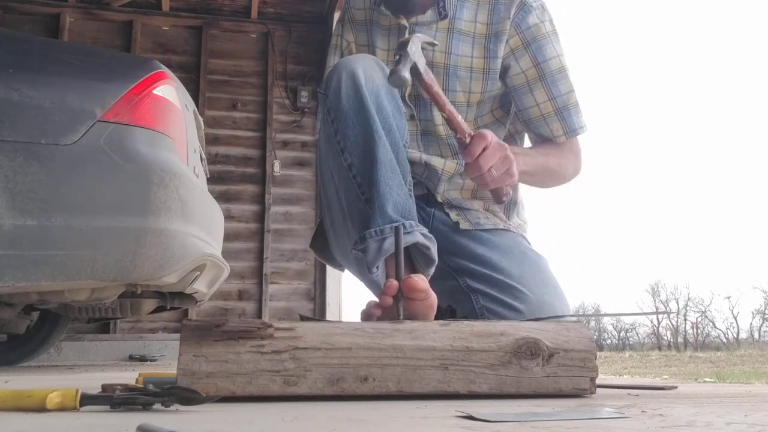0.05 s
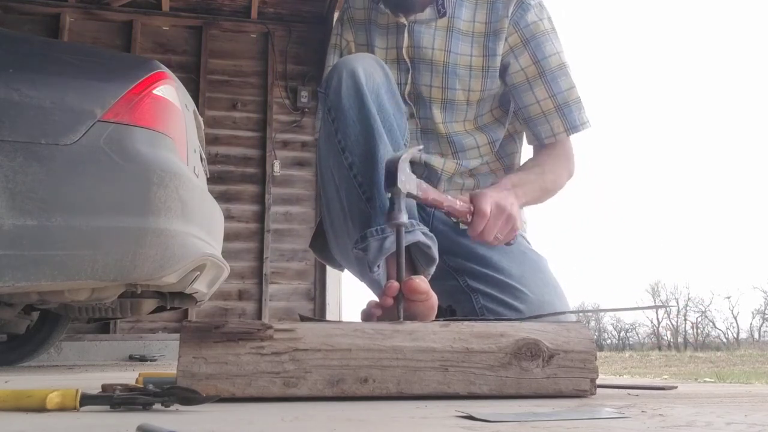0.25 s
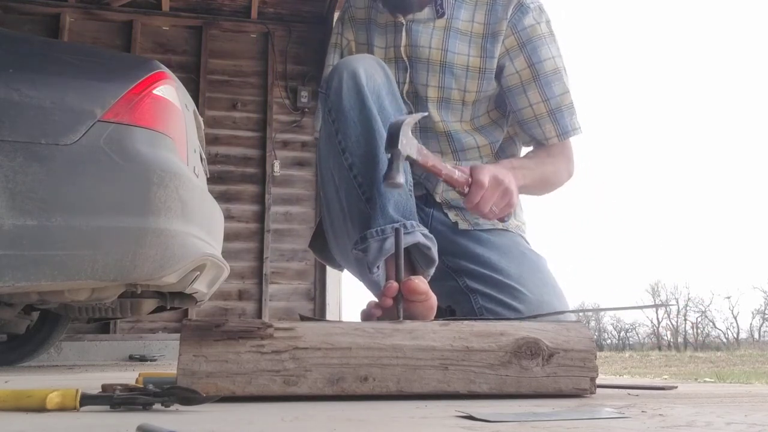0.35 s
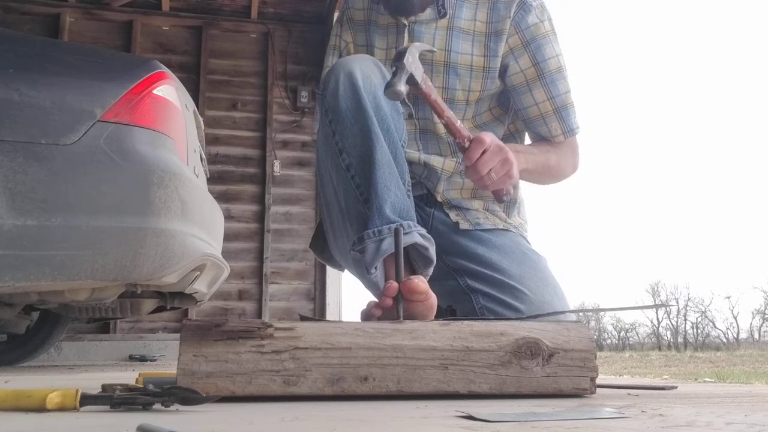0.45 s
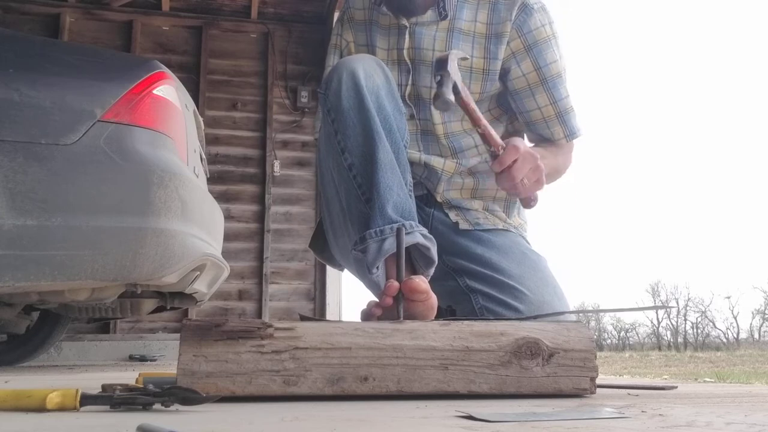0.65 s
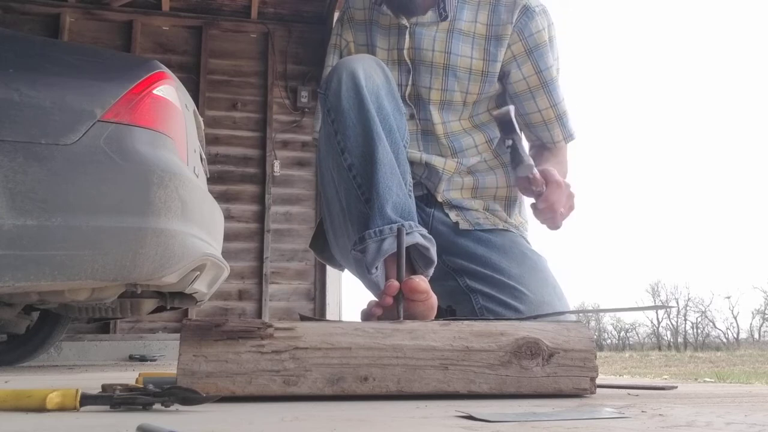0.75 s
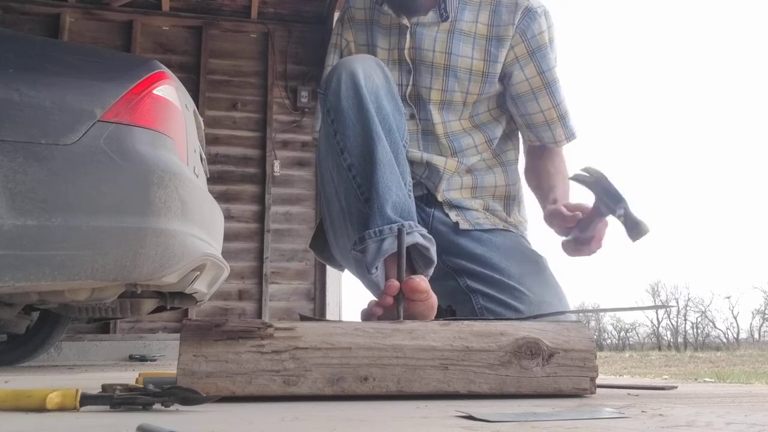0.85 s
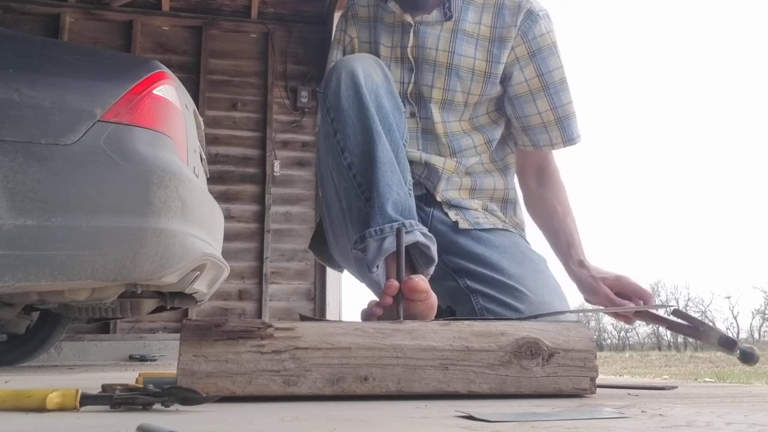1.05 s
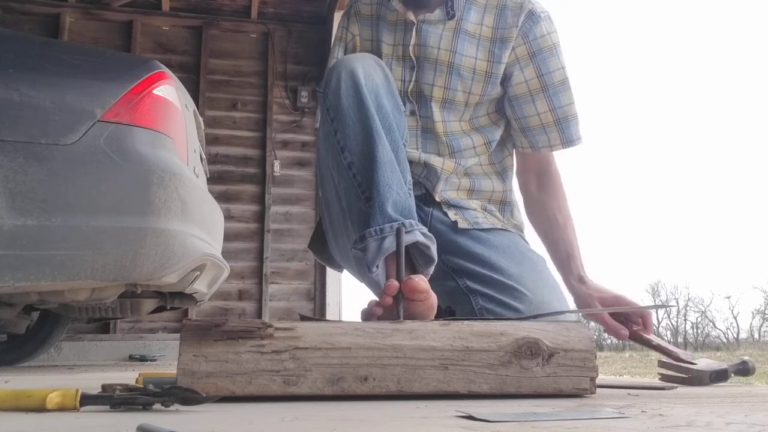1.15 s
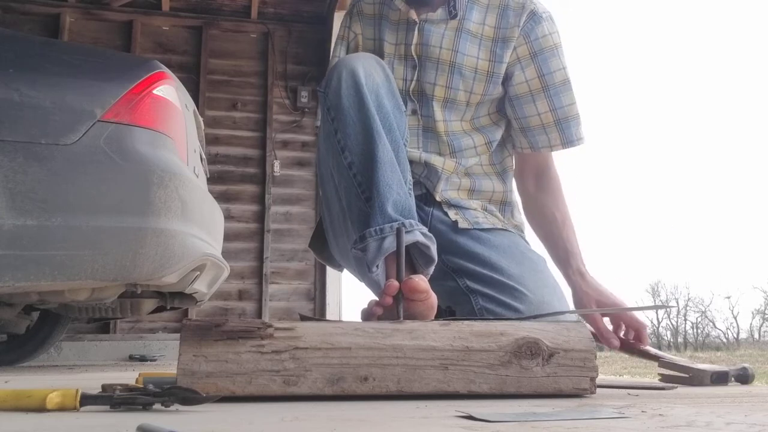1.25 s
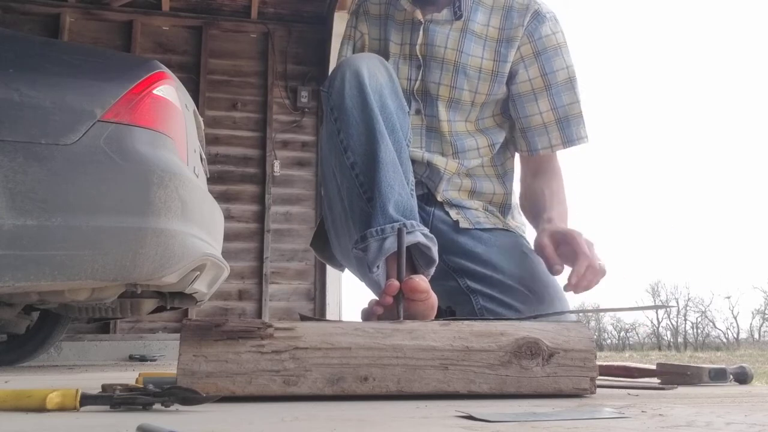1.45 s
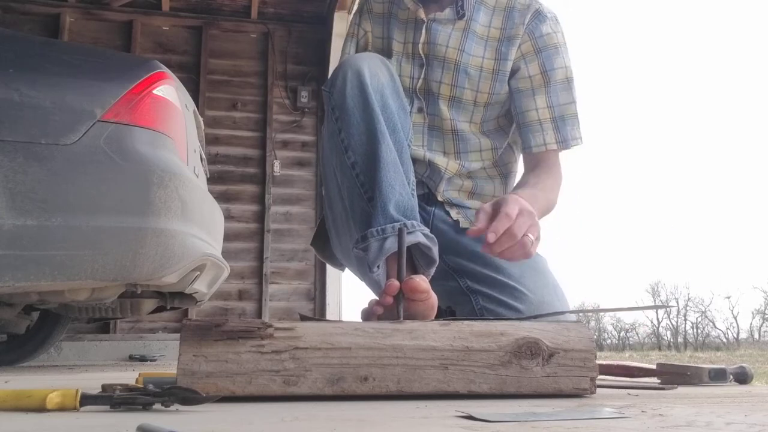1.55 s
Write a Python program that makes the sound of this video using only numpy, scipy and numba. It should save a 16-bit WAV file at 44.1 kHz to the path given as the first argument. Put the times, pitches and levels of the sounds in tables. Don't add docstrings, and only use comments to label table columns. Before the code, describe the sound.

A hammer strikes a steel punch through thin sheet metal on a log, over the fading ring of an earlier blow; then the hammer is set down, knocking and scraping on concrete. Open garage, close phone microphone.

```python
import sys
import numpy as np
from scipy import signal
from scipy.fft import rfft, irfft
from scipy.io import wavfile
from numba import njit

SR = 44100
rng = np.random.default_rng(int(sys.argv[2]) if len(sys.argv) > 2 else 0)


def makeup_ratio(level_db):
    decades = np.asarray(level_db, float) / 20
    return 10 ** decades


def inscribe(sig):
    pcm = np.round(np.clip(np.atleast_2d(sig).T, -1, 1) * 32767)
    wavfile.write(sys.argv[1], SR, pcm.astype(np.int16))


N = 70560
ALIKE_HZ = 1300
EARS = np.array([[1], [-1]])


def colour(table, hz):
    table_hz, value = np.array(table).T
    return np.interp(np.log(hz + 1), np.log(table_hz), value)


def ring(modes, seconds):
    hz, db, t60 = np.array(modes, float).T[:, :, None]
    t = np.arange(int(seconds * SR)) / SR
    turn = rng.uniform(-np.pi, np.pi, (len(hz), 2))
    apart = turn[:, 1] * np.minimum(hz[:, 0] / ALIKE_HZ, 1) / 3
    start = (makeup_ratio(db) * np.exp(1j * turn[:, :1])).astype(np.complex64)
    spin_and_decay = (2j * np.pi * hz - np.log(1000) / t60).astype(np.complex64)
    z = start * np.exp(spin_and_decay * t.astype(np.float32))
    ears = np.exp(1j * np.array([apart, -apart])).astype(np.complex64)
    return (ears @ z).imag.astype(float)


def noise(table, grains=1):
    hz = np.arange(N // 2 + 1) * SR / N
    mid, side = rfft(rng.standard_normal((2, N)) * grains) * makeup_ratio(colour(table, hz))
    width = np.minimum(hz / ALIKE_HZ + 0.23, .85)
    x = irfft(mid + EARS * side * width, N)
    return x / np.std(x)


def add(out, x, s):
    i = int(s * SR)
    x = x[:, max(-i, 0):N - i]
    out[:, max(i, 0):max(i, 0) + x.shape[1]] += x


# frequency in Hz, level in dB per Hz.
AIR_COLOUR = [(20, -11), (50, -2), (120, -4), (200, -13.5), (300, -17.5), (600, -36.5), (1500, -43),
              (16000, -44.5)]


def air():
    t = np.arange(N) / SR
    early_db = 11.5 * (t < BLOWS[1][0])
    return noise(AIR_COLOUR) * makeup_ratio(-69.5 + early_db)


# time in seconds, pitch in Hz, level in dB, second order level in dB.
ENGINE = [(0.0, 89, -43.5, -66), (0.24, 84.08, -44, -53.5), (0.27, 86.74, -74, -68), (0.28, 83.8, -57, -63),
          (0.342, 79.15, -62.5, -50), (0.466, 80.17, -56, -62), (0.944, 80.53, -59.5, -68),
          (1.136, 81.36, -63, -67), (1.234, 85.2, -74, -68.5), (1.292, 84.9, -56.5, -77.5),
          (1.542, 87.7, -46.5, -69.5), (1.6, 85, -49, -60)]


def engine():
    t = np.arange(N) / SR
    s, *columns = np.array(ENGINE).T
    hz, db, second_db = (np.interp(t, s, column) for column in columns)
    turn = 2 * np.pi * np.cumsum(hz) / SR
    wobble_db = 1.5 * np.interp(t, np.arange(80) / 40, rng.standard_normal(80))
    first = makeup_ratio(db + wobble_db) * np.sin(turn)
    second = makeup_ratio(second_db - wobble_db) * np.sin(2 * turn)
    return np.sqrt(2) * (first + second)


def garage(sound):
    t60_s, gap_s, top_hz, level_db = .45, .004, 6570, -9
    t = np.arange(SR // 2) / SR
    fade = np.exp(-np.log(1000) * t / t60_s) * (t > gap_s)
    tail = signal.lfilter(*signal.butter(1, top_hz, fs=SR), rng.standard_normal((2, SR // 2))) * fade
    tail = tail / np.sqrt(np.sum(tail[0] ** 2))
    return makeup_ratio(level_db) * signal.fftconvolve(sound.mean(0)[None], tail, axes=1)[:, :N]


# frequency in Hz, level in dB per Hz.
GRIT = [(100, -32), (200, -5.5), (700, -11), (2100, -18), (3200, -17.5), (6800, -31), (7400, -42),
        (16000, -47)]
# time in seconds, level in dB.
DRAG = [
    (1.102, -78),
    (1.106, -47),
    (1.2, -52.5),
    (1.3, -58.5),
    (1.32, -50.5),
    (1.44, -52),
    (1.5, -50.5),
    (1.6, -54),
]
# frequency in Hz, width in Hz, level in dB.
SCRAPE = [(1230, 56, -12.5), (2610, 130, 7), (3413, 53, 3), (4180, 110, 9), (5100, 50, 19.5),
          (5860, 40, 20), (6755, 91, 16), (8100, 220, 14), (11000, 510, 4.5), (14500, 240, 15)]


def scrape():
    grains_per_s, spread_db = 8100, 2
    t = np.arange(N) / SR
    grains = (rng.random(N) < grains_per_s / SR) * makeup_ratio(spread_db * rng.exponential(size=N))
    drag = makeup_ratio(np.interp(t, *np.array(DRAG).T)) * (t > DRAG[0][0])
    grit = noise(GRIT, grains) * drag
    out = grit.copy()
    for hz, width, db in SCRAPE:
        out += makeup_ratio(db) * signal.lfilter(*signal.iirpeak(hz, hz / width, SR), grit)
    return out


def touch(modes):
    scatter_db = 2 * rng.standard_normal((len(modes), 1))
    return ring(np.array(modes) + [0, 1, 0] * scatter_db, .16)


# start in seconds, then handle, head, cheek and claw tick levels in dB.
KNOCKS = [(1.1045, -32.5, -37, -47, -49.5), (1.1245, -19.5, -50, -58, -54), (1.1274, -22, -25, -42, -35),
          (1.135, -25.5, -34, -44, -66), (1.142, -27.5, -20, -55, -45), (1.150, -29, -28, -40, -59),
          (1.164, -37.5, -26.5, -54, -71), (1.176, -58, -30.5, -54, -67), (1.189, -45, -32.5, -56, -71),
          (1.206, -62, -33.5, -57, -62.5), (1.218, -32, -42.5, -53, -48), (1.232, -62, -46, -60, -66),
          (1.2544, -31, -41, -43, -44.5), (1.264, -35, -25, -38, -56), (1.299, -60, -45, -71, -69.5),
          (1.319, -24.5, -30, -20.5, -18.5), (1.329, -57, -18, -24, -39), (1.335, -49.5, -27, -47, -26.5),
          (1.3412, -61, -22.5, -13.5, -55.5), (1.354, -29, -49, -22, -22), (1.363, -54, -25.5, -47, -33),
          (1.405, -67.5, -30, -30, -58), (1.4525, -26.5, -31, -35, -28), (1.4627, -61, -19.5, -35.5, -38),
          (1.4669, -69, -15.5, -21.5, -44), (1.4738, -46, -21.5, -17, -43), (1.4805, -59.5, -17, -26, -43),
          (1.505, -59, -35.5, -47, -61.5), (1.518, -59, -30, -29, -55), (1.536, -34.5, -32, -48, -42.5),
          (1.547, -35.5, -26.5, -36, -46), (1.551, -47.5, -21.5, -37, -50.5),
          (1.5589, -51, -34, -30, -45.5), (1.564, -60, -28.5, -34, -57), (1.590, -41, -33, -53.5, -49),
          (1.597, -54, -42, -50, -43)]
# frequency in Hz, level in dB, t60 in seconds.
HELD_HANDLE = [(1373, 0, .022), (1740, -2, .015), (1180, -4, .02), (840, -10, .025), (490, -18, .03)]
HELD_HEAD = [(2570, 0, .14), (2449, -10, .04), (2369, -14, .04), (3408, -18, .06)]
HANDLE = [(1314, 0, .12), (1420, -10, .02), (490, -15, .03), (900, -12, .025)]
HEAD = [(2614, 0, .08), (2660, -10, .07), (2896, -12, .05), (3090, -6, .015)]
CHEEK = [(4250, 0, .012), (3926, -2, .016), (4328, -17, .14), (4700, -9, .02), (4215, -17, .12)]
CLAW = [(5190, 0, .05), (5020, -6, .06), (5830, -3, .045), (5932, -14, .1), (6800, -11, .1),
        (6444, -5, .025), (8300, -20, .05), (3100, -4, .03), (10210, -22, .05), (14130, -18, .07)]
# frequency in Hz, level in dB per Hz.
DULL = [(100, -19), (300, -8), (1400, 2), (2400, -3.5), (5000, -29.5), (16000, -66)]
TICK = [(300, -67), (2500, 9), (4500, 7.5), (7000, -5.5), (9000, -10), (14200, -14), (15200, -28),
        (16000, -30)]


def knocks():
    let_go_s, contact_s = 1.25, 0.00044
    head_stop_s = .0015
    handle_free_s, handle_stop_s = .02, .005
    dull_db, dull_s, tick_level_db, tick_s = -8.5, 0.0045, -4, 0.0074
    out = np.zeros((2, N))
    dull, tick = noise(DULL), noise(TICK)
    until_next_s = np.diff(np.array(KNOCKS)[:, 0], append=2)
    for k, (s, handle_db, head_db, cheek_db, tick_db) in enumerate(KNOCKS):
        handle, head = (HELD_HANDLE, HELD_HEAD) if s < let_go_s else (HANDLE, HEAD)
        steel = makeup_ratio(cheek_db) * touch(CHEEK) + makeup_ratio(tick_db) * touch(CLAW)
        n = steel.shape[1]
        t = np.arange(n) / SR
        head_stop = np.exp(-np.maximum(t - until_next_s[k], 0) / head_stop_s)
        handle_stop = np.exp(-np.maximum(t - handle_free_s, 0) / handle_stop_s)
        steel += makeup_ratio(head_db) * touch(head) * head_stop
        steel += makeup_ratio(handle_db) * touch(handle) * handle_stop
        fresh = slice(1500 * k, 1500 * k + n)
        knock = makeup_ratio(dull_db + handle_db) * dull[:, fresh] * np.exp(-t / dull_s)
        contact = 1 - np.exp(-(t / contact_s) ** 2)
        click = makeup_ratio(tick_level_db + tick_db) * tick[:, fresh] * np.exp(-t / tick_s)
        add(out, (steel / 2 + knock) * contact + click, s)
    return out


def hammer():
    close = knocks() + scrape()
    left_minus_right_db = -2
    return close * makeup_ratio(EARS * left_minus_right_db / 2) + garage(close)


# frequency in Hz, level in dB per Hz.
PLATE = [(100, -18.5), (200, -7.5), (500, -8.5), (950, -17), (2200, -11.5), (6800, -4.5), (9000, -9),
         (16000, -11)]
# frequency in Hz, width
# in Hz, level in dB.
CLUSTERS = [(1486, 320, 15), (2164, 250, 11.5), (2890, 330, 10.5), (5060, 420, 5), (6756, 150, 9.5),
            (10680, 220, 10), (12470, 350, 7), (14600, 270, 0), (4540, 190, -15), (1720, 160, -8),
            (10770, 85, -11), (6920, 33, -13.5), (8570, 230, -7)]
# frequency in Hz, t60 in seconds.
PLATE_T60 = [(120, 0.86), (300, 0.41), (1000, .38), (3000, 0.31), (6500, 0.36), (9000, 0.28), (16000, 0.23)]
# frequency in Hz, left minus right in dB.
BLOW_PAN = [(300, 1), (2800, -1), (5500, 2.5), (10000, -3.5), (16000, -6)]
RISE_S = 0.0008


def crash(count):
    hold_s = 0.036
    hz, t = np.arange(count // 2 + 1) * SR / count, np.arange(count) / SR
    db = colour(PLATE, hz)
    for f, width, cluster_db in CLUSTERS:
        db = db + cluster_db / (1 + (2 * (hz - f) / width) ** 2)
    mid, side = rfft(rng.standard_normal((2, count)))
    both = mid + EARS * side * np.minimum(hz / ALIKE_HZ, 1)
    both = both * makeup_ratio(db + EARS * colour(BLOW_PAN, hz) / 2)
    late = np.sqrt((t - hold_s) ** 2 + 0.004 ** 2) / 2 + (t - hold_s) / 2
    out = 0
    for step in np.arange(24):
        band = np.maximum(1 - np.abs(3 * np.log2(hz / 90 + 1e-9) - step), 0)
        t60 = colour(PLATE_T60, 90 * 2 ** (step / 3))
        out = out + irfft(both * band, count) * makeup_ratio(-60 * late / t60)
    return out / np.std(out[:, :2000]) * (1 - np.exp(-t / RISE_S))


# frequency in Hz, level in dB per Hz.
FLUTTER = [(400, -33.5), (640, -5), (900, -14), (1500, -15), (2000, 0), (2400, -11.5), (4500, -16.5),
           (7000, -39)]


def crack(t, flutter_db):
    crack_s, thump_s, flutter_t60_s = 0.0019, .012, 0.37
    snap = makeup_ratio(-6) * noise(PLATE)[:, :SR] * t / crack_s * np.exp(1 - t / crack_s)
    thump = makeup_ratio(-18.5) * noise(DULL)[:, :SR] * np.exp(-t / thump_s) * (1 - np.exp(-t / RISE_S))
    flutter = makeup_ratio(flutter_db - 60 * t / flutter_t60_s) * noise(FLUTTER)[:, :SR]
    return snap + thump + flutter


# frequency in Hz, level in dB, t60 in seconds.
LOG = [
    (156.4, -0.5, 0.25),
    (197.6, 4.5, 0.13),
    (249, 1, 0.28),
    (333, -13.5, 0.6),
]


def log_boom(t):
    late_s = 0.015
    return makeup_ratio(-28.5) * ring(LOG, 1) * (1 - np.exp(-(t / late_s) ** 2))


# frequency in Hz, level in dB, t60 in seconds.
PUNCH = [(6788, -5, .3), (6740, -8, .25), (6850, -9, .25), (6940, -11, .2), (7030, -12, .2), (3860, -4, .2),
         (2112, -10, .2), (2186, -11, .2), (2380, -7, .15), (5222, -7, .17), (11790, -13, .17),
         (12430, -12, .2), (14550, -14, .2), (10262, -16, .2)]


def punch_ring(t, shaft_db):
    shaft_hz, shaft_level_db, shaft_t60_s, shaft_rise_s = 5948, -22, .47, .16
    beat_hz, beat_peak_s, beat_depth = 5.4, .415, .75
    beat = 1 + beat_depth * np.cos(2 * np.pi * beat_hz * (t - beat_peak_s))
    shaft = ring([(shaft_hz, shaft_level_db + shaft_db, shaft_t60_s)], 1)
    return makeup_ratio(-9.5) * ring(PUNCH, 1) + beat * (1 - np.exp(-t / shaft_rise_s)) * shaft


# start in seconds, level in dB, plate flutter in dB, shaft ring in dB.
BLOWS = [
    (-.39, 15.5, -11.5, 0),
    (0.2374, -1.5, -29, 1),
]


def blows():
    out, t = np.zeros((2, N)), np.arange(SR) / SR
    build = 1 - .55 * np.exp(-t / .012)
    for s, db, flutter_db, shaft_db in BLOWS:
        plate = makeup_ratio(-11) * crash(SR)
        ringing = build * (plate + punch_ring(t, shaft_db))
        add(out, makeup_ratio(db) * (ringing + crack(t, flutter_db) + log_boom(t)), s)
    return out


def scene():
    return air() + engine() + hammer() + blows()


@njit
def follow(x, up, down):
    e, y = 0., np.empty(len(x))
    for i in range(len(x)):
        e += (x[i] - e) * (up if x[i] > e else down)
        y[i] = e
    return y


def band_limit(x):
    return signal.sosfilt(signal.butter(12, 16850, fs=SR, output="sos"), x)


def record(dry):
    notch_hz, notch_width_hz, notch_share = 7850, 1000, .88
    limit_db, ratio, attack_s, release_s = -9.5, 5.6, 0.0032, 0.014
    bass_cut_hz, top_hz = 26, 15750
    notch = signal.iirpeak(notch_hz, notch_hz / notch_width_hz, SR)
    dry = dry - notch_share * signal.lfilter(*notch, dry)
    dry = signal.lfilter(*signal.butter(2, bass_cut_hz, "high", fs=SR), dry)
    level = follow(np.abs(dry).max(0), 1 / (attack_s * SR), 1 / (release_s * SR))
    gain = np.minimum(makeup_ratio(limit_db) / (level + 1e-9), 1) ** (1 - 1 / ratio)
    x = np.tanh(dry * gain)
    x = signal.sosfilt(signal.ellip(8, .2, 60, top_hz, fs=SR, output="sos"), x)
    return band_limit(x)


dry = scene()
out = record(dry)
inscribe(out)
```